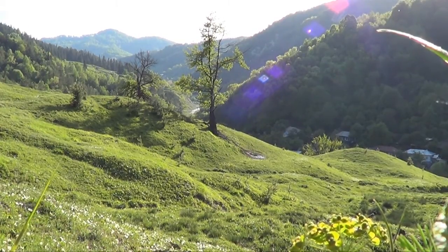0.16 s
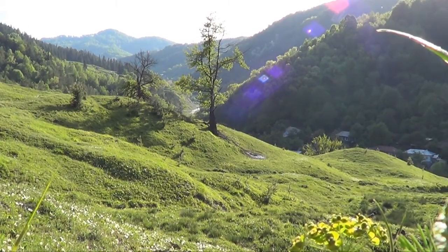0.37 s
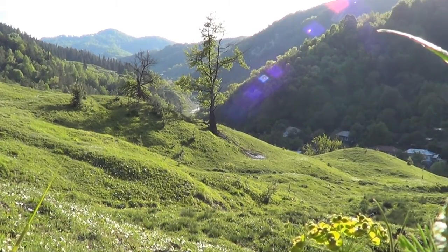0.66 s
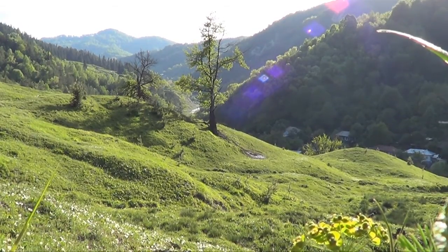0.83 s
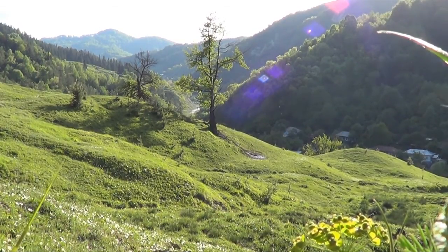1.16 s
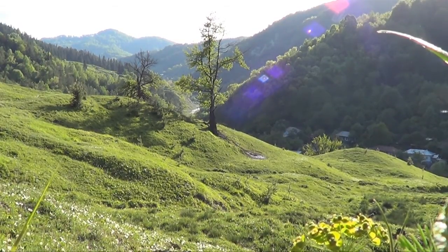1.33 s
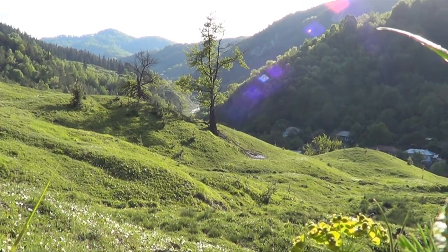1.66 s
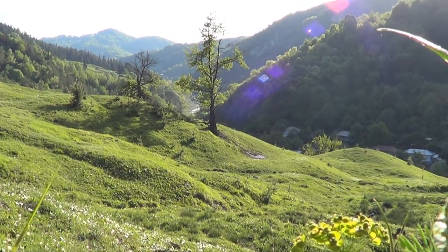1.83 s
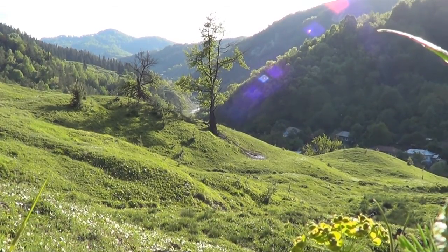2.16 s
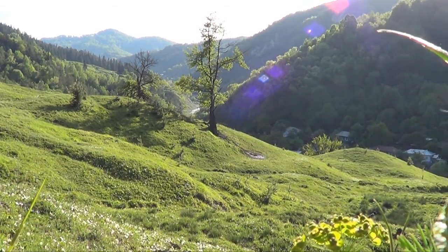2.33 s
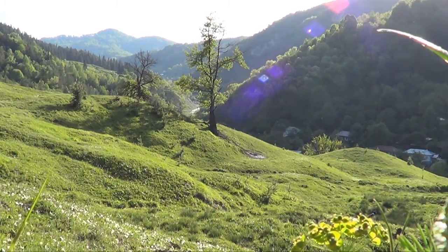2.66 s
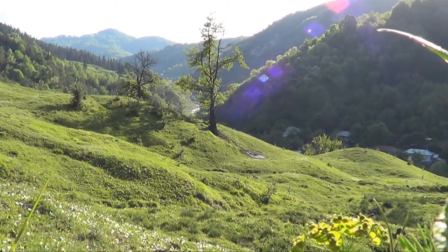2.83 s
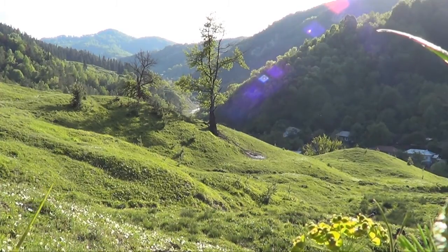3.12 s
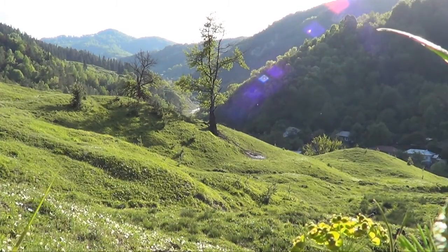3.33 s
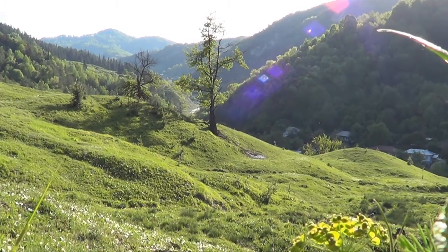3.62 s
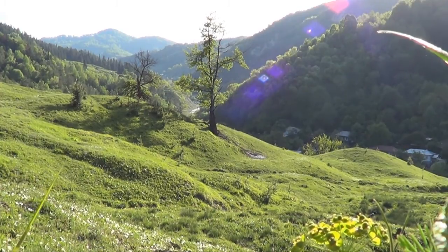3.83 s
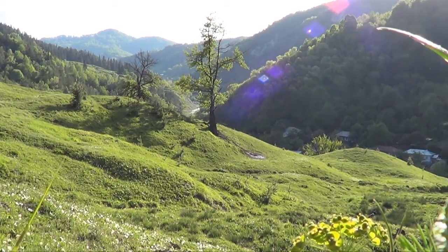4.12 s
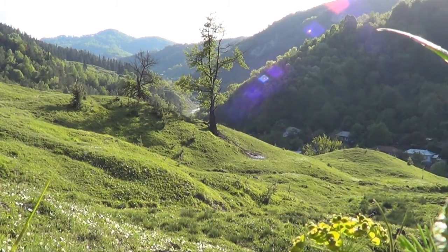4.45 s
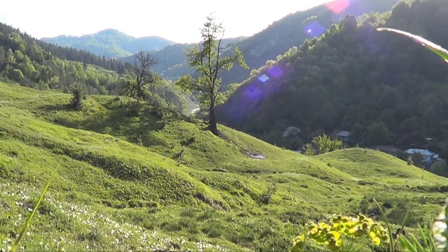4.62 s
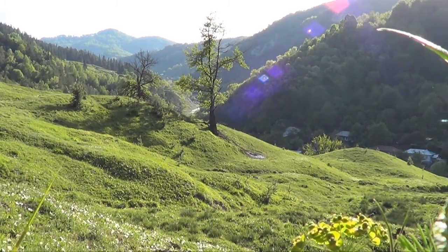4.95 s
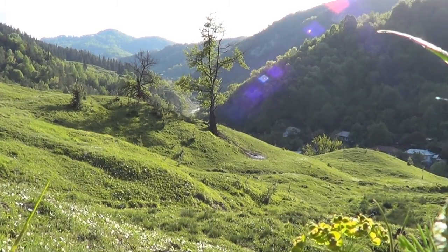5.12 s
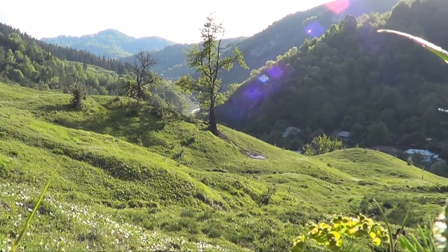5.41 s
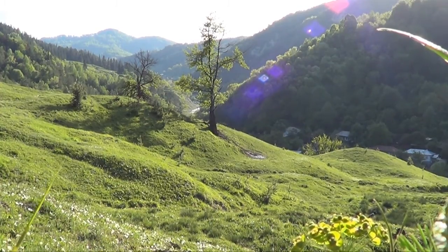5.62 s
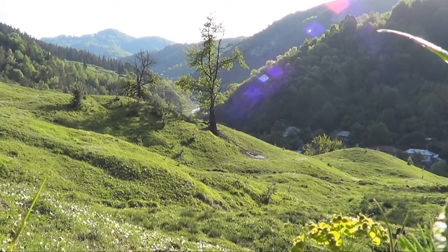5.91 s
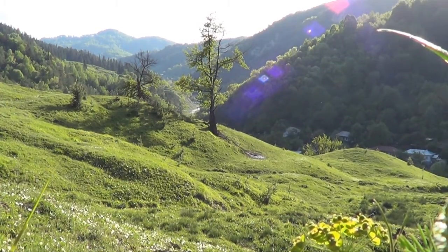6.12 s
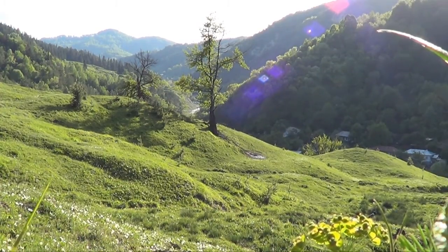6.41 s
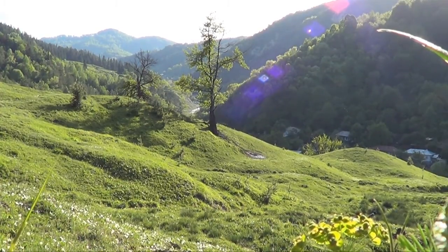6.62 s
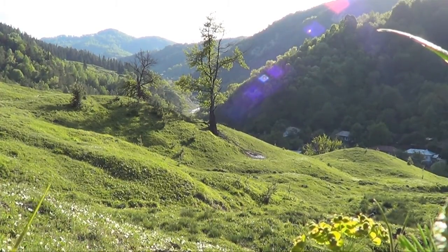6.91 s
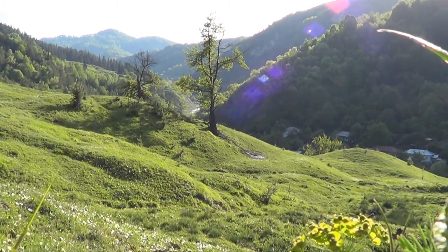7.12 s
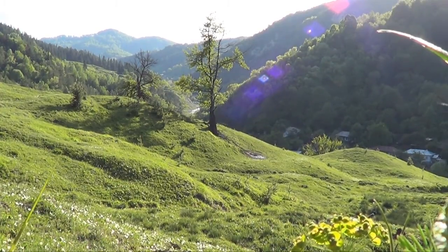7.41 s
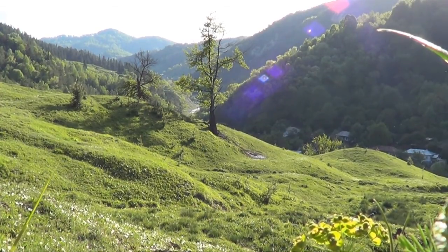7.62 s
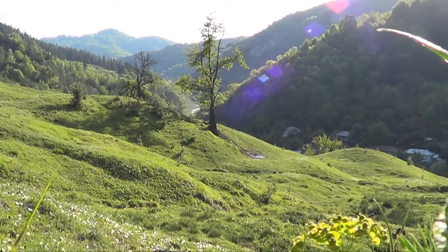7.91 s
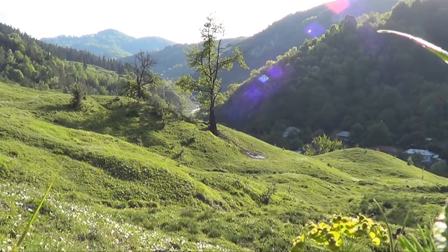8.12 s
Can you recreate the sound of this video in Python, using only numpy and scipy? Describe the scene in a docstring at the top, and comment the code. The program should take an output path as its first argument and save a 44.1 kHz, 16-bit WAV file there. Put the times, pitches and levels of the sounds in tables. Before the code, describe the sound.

Quiet outdoor stereo ambience on a grassy slope, with light wind rumbling on the microphone and tiny dry ticks from stalks. A distant woodpecker rolls, a nearer and lower-toned one answers much louder with woody echoes, and a breeze stirs the grass. Later, faint rising chirps lead into the distant drum again, overlapped by a finch's chattering song, then clear high whistles slightly to the right.

```python
"""Drumming in a mountain meadow

Two woodpeckers drum on branches: volleys of short wooden rings, each speeding up, with echoes from the trees.
Towards the end a finch sings in gliding near-pure tones, and a second small bird whistles above it.
Dry stalks tick as filtered noise bursts; a breeze rumbles on the microphone and rustles the grass.
Underneath lies the valley's soft hush of coloured noise."""
import sys
import numpy as np
from scipy import signal
from scipy.fft import rfft, irfft
from scipy.io import wavfile
from scipy.ndimage import uniform_filter1d

SR = 44100
rng = np.random.default_rng(int(sys.argv[2]) if len(sys.argv) > 2 else 0)


def dump_mix(stems):
    """Bounce the given channels to the path in sys.argv[1] as a 16-bit WAV at rate SR."""
    frames = np.atleast_2d(stems).T  # one column per channel
    limited = np.clip(frames, -1, 1)  # hard clip at full scale
    pcm = np.round(limited * 32767).astype(np.int16)
    wavfile.write(sys.argv[1], SR, pcm)


N = 364707
TIME = np.arange(N) / SR


def undb(db):
    """Decibels to gain."""
    return 10 ** (np.asarray(db) / 20)


def unit(x):
    """Scale to an rms of one."""
    return x / np.sqrt(np.mean(x ** 2))


def add(track, start_s, sound):
    """Mix a sound into a track at a time, cut at the track's end."""
    i = max(int(round(start_s * SR)), 0)
    track[i:i + len(sound)] += sound[:max(N - i, 0)]


def colour(x, points):
    """Filter a signal through a curve of (f/Hz, level/dB) points, straight over log frequency; rms one."""
    hz, db = np.transpose(points)
    bins = np.fft.rfftfreq(len(x), 1 / SR) + 0.1  # keeps the logarithm finite at 0 Hz
    gain = undb(np.interp(np.log(bins), np.log(hz), db))
    return unit(irfft(rfft(x) * gain, len(x)))


def walk(rate):
    """A random control curve: levels held for 1 / rate s, slewed twice; rms one."""
    hold = int(SR / rate)
    steps = np.repeat(rng.standard_normal(N // hold + 1), hold)
    return unit(uniform_filter1d(uniform_filter1d(steps, hold), hold)[:N])


def stereo(mid, side):
    """Left and right from what they share and what differs."""
    return np.array([mid + side, mid - side])


def forest(x, scatter, wet_db, t60, side_db, onset_s, direct_side_db):
    """Echoes from many trunks, large and small: a tail that builds up and dies away, different in each ear."""
    t = np.arange(SR) / SR
    envelope = (1 - np.exp(-t / onset_s)) * undb(-60 * t / t60)
    envelope = undb(wet_db) * envelope / np.sqrt(np.sum(envelope ** 2))
    trunks = rng.standard_normal((2, SR)) * (rng.random((2, SR)) < 1500 / SR)  # about 1500 echoes a second
    mid, side = (signal.fftconvolve(x, envelope * colour(echoes, scatter))[:N] for echoes in trunks)
    # sound from the right reaches the left port a fraction of a sample late
    lag = -undb(direct_side_db) * np.gradient(x)
    return stereo(x + mid, undb(side_db) * side + lag)


def roll(start, blows, first_gap, last_gap, full_db, first_db, build_s, last_db, lateness, hurry):
    """Rows (t/s, level/dB): the beak rebounds ever faster while its force builds up and then runs out."""
    along = np.linspace(0, 1, int(round(blows)))
    gaps = first_gap + (last_gap - first_gap) * np.linspace(0, 1, len(along) - 1) ** hurry
    t = np.append(0, np.cumsum(gaps))
    build_db = first_db * np.exp(-t / build_s)
    fade_db = last_db * along ** lateness
    return np.column_stack([start + t, full_db + build_db + fade_db])


def drumming(blows, wood, echoes, low_hz, top_hz, soft_db, echo_hz):
    """Each blow rings the branch briefly; weak blows are duller; ground and trunks throw it back."""
    t = np.arange(SR // 20) / SR
    hz, db, t60, swing = np.transpose(wood)[:, :, None]
    hardest_db = max(blow_db for _, blow_db in blows)
    low_cut = signal.butter(2, low_hz, "high", fs=SR, output="sos")
    top_cut = signal.butter(6, top_hz, fs=SR, output="sos")
    track = np.zeros(N)
    for start, blow_db in blows:
        dull_db = soft_db * (blow_db - hardest_db) * np.log2(hz / hz[0])
        detune = 1 + 0.0025 * rng.standard_normal(hz.shape)  # the beak never lands on quite the same spot
        decay = undb(db + dull_db - 60 * t / t60)
        ring = np.sum(np.sign(swing) * decay * np.sin(2 * np.pi * hz * detune * t), axis=0)
        knock = signal.sosfilt(np.vstack([low_cut, top_cut]), ring)
        slip_s = 0.0004 * rng.standard_normal()  # each blow shifts at random by a fraction of a millisecond
        add(track, start + slip_s, undb(blow_db) * knock / np.abs(knock).max())
    # turf and bark swallow the top of the echoes
    dulled = signal.sosfiltfilt(signal.butter(2, echo_hz, fs=SR, output="sos"), track)
    returns = (undb(echo_db) * np.interp(TIME - delay, TIME, dulled, left=0) for delay, echo_db in echoes)
    return track + sum(returns)


# ringing modes of each branch: [f/Hz, level/dB, t60/s, +1 or -1: swings with or against the blow]
FAR_WOOD = [(837, -8, 0.011, 1), (1073, -6.5, 0.024, -1), (1660, 3.5, 0.0036, -1), (1835, -12, 0.039, 1),
            (2168, -11.5, 0.019, 1), (2530, -18.5, 0.026, -1), (2820, -20, 0.018, -1)]
NEAR_WOOD = [(450, -27.5, 0.0063, 1), (884, -19.5, 0.013, 1), (1238, -6.5, 0.011, 1),
             (1547, 0.0, 0.011, -1), (1704, -7, 0.011, 1), (2224, -17.5, 0.013, -1)]
# single echoes from ground and trunks: [delay t/s, level/dB]
FAR_ECHOES = [(.00175, -5.5), (.0078, -14.5), (0.0237, -13), (0.0463, -24)]
NEAR_ECHOES = [(.0058, -13.5), (0.011, -25), (0.04, -18)]
# colour of what the trees send back: [f/Hz, level/dB]
FAR_SCATTER = [(1000, -0.0059), (1350, 1), (1750, -2.6), (2600, -1.4)]
NEAR_SCATTER = [(500, 5), (850, -2), (1550, -11.5), (2000, 7.5), (2220, 0), (2900, 4.5)]
# drum rolls: [start t/s, blows, first gap t/s, last gap t/s, full force level/dB, first blow re full level/dB,
#              build-up t/s, last blow re full level/dB, lateness of the fade as a power]
FAR_ROLLS = [(1.5654, 14, .0604, .03633, -21, -17, 0.1, -19.5, 3.9),
             (6.9422, 15, .05764, .03458, -20.5, -13.5, 0.14, -18.5, 2.45)]
NEAR_ROLLS = [(2.9427, 11, .0589, .04275, -9.5, -10.5, 0.037, -10, 4.1)]
# how late in a roll each bird speeds up (power; 1 = evenly)
FAR_HURRY, NEAR_HURRY = 1, 1.79


def woodpeckers():
    """The far bird opens, the near one answers, the far one drums again; each branch has its own ring."""
    far_blows = np.vstack([roll(*row, FAR_HURRY) for row in FAR_ROLLS])
    near_blows = np.vstack([roll(*row, NEAR_HURRY) for row in NEAR_ROLLS])
    far = drumming(far_blows, FAR_WOOD, FAR_ECHOES, low_hz=820, top_hz=3010, soft_db=0.7, echo_hz=2240)
    near = drumming(near_blows, NEAR_WOOD, NEAR_ECHOES, low_hz=253, top_hz=3160, soft_db=0.16, echo_hz=3000)
    return (forest(far, FAR_SCATTER, wet_db=-6.0, t60=0.46, side_db=-13, onset_s=0.0034, direct_side_db=-5)
            + forest(near, NEAR_SCATTER, wet_db=3.5, t60=0.42, side_db=-12.5, onset_s=0.012, direct_side_db=-9.5))


def note(shape, waver, flutter_db):
    """A nearly pure tone sliding along (t/s, f/Hz, level/dB) points, unsteady in pitch and level."""
    s, hz, db = np.transpose(shape)
    t = np.arange(s[0], s[-1], 1 / SR)
    pitch = uniform_filter1d(np.interp(t, s, hz), SR // 250)
    knots = np.arange(s[0], s[-1], 1 / 300)
    wobble, flutter = (np.interp(t, knots, rng.standard_normal(len(knots))) for _ in range(2))
    size = undb(np.interp(t, s, db) + flutter_db * flutter) * signal.windows.tukey(len(t), 0.1)
    return size * np.sin(2 * np.pi * np.cumsum(pitch * (1 + waver * wobble)) / SR)


def syllable(shape, length, hoarse):
    """One utterance of a shape; no two are at quite the same pitch."""
    detune = 1 + 0.00804 * rng.standard_normal()
    return note(np.array(shape) * [length, detune, 1], waver=hoarse, flutter_db=2.5)


WHISTLE_SETTLE_S = 0.008
WHISTLE_OPEN_DB, WHISTLE_CLOSE_DB = -12.5, -15  # relative to the loudest moment


def whistle(length, open_hz, settled_hz, close_hz, db, loudest_s):
    """The pitch snaps onto a slow glide while the tone swells and fades."""
    t = np.linspace(0, length, SR // 1000)
    glide = np.interp(t, [0, length], [settled_hz, close_hz])
    hz = glide + (open_hz - settled_hz) * np.exp(-t / WHISTLE_SETTLE_S)
    swell_db = np.interp(t, [0, loudest_s, length], [WHISTLE_OPEN_DB, 0, WHISTLE_CLOSE_DB])
    return note(np.column_stack([t, hz, db + swell_db]), waver=0.0037, flutter_db=4.0)


# syllable shapes: [t/s, f/Hz, level/dB]
UPSLUR = [(0, 2605, -5), (.03, 3280, -5), (.055, 4300, 0), (.075, 5360, -7)]
PIP = [(0, 2700, 2.5), (.012, 3190, -7), (.028, 3800, 1.5)]
TSIP = [(0, 6500, 0), (.015, 5790, -3.5), (.03, 5000, 0), (.045, 5100, -5)]
CHIP = [(0, 5135, -3), (.01, 4670, -4.5), (.022, 3950, -1.5), (.03, 4150, -4.5)]
WARBLE = [(0, 4480, -13), (.013, 4810, -5), (.023, 4620, -24), (.032, 4270, -1.5), (.042, 3700, -0.5),
          (.053, 3110, -2), (.065, 3670, -2.5), (.072, 3200, -22), (.088, 3577, -1.5), (.098, 2927, -5),
          (.109, 2080, -6.5)]
# lone rising chirps before the song: [start t/s, level/dB, length relative to the shape]
UPSLURS = [(5.829, -61.5, 0.97), (6.036, -62, 0.49), (6.086, -56, 0.47), (6.175, -53.5, 0.89)]
# the finch's song, one run per syllable: [shape, first start t/s, last start t/s, repeats,
#                                          first level/dB, last level/dB, hoarseness as a share of pitch]
FINCH_RUNS = [(PIP, 6.362, 6.812, 5, -59.5, -55, 0.043), (TSIP, 6.43, 6.752, 6, -59.5, -55, .06),
              (CHIP, 6.81, 7.258, 8, -51, -44, 0.032), (WARBLE, 7.326, 8.147, 6, -41, -41, 0.0161)]
# share by which the gaps of a run start short and end long
FINCH_SLOWING = 0.035
# thin whistles: [start t/s, length t/s, opening f/Hz, settled f/Hz, closing f/Hz, level/dB, loudest after t/s]
WHISTLES = [(7.59, 0.13, 7100, 5150, 5500, -39, 0.042), (7.89, 0.13, 7150, 5900, 5710, -37.5, .058),
            (8.049, .107, 6900, 4900, 5500, -38, 0.098), (8.192, 0.074, 5700, 6300, 4750, -34.5, 0.027)]
# colour of what the trees send back of the song: [f/Hz, level/dB]
SONG_SCATTER = [(3000, -0.18), (4000, -0.45), (6000, -0.13)]


def songbirds():
    """Faint rising chirps, then the finch's slightly slowing runs of gliding tones, and the whistler on top."""
    finch, whistler = np.zeros(N), np.zeros(N)
    for start, db, length in UPSLURS:
        add(finch, start, undb(db) * syllable(UPSLUR, length, hoarse=0.014))
    for shape, first_s, last_s, repeats, first_db, last_db, hoarse in FINCH_RUNS:
        for along in np.linspace(0, 1, int(round(repeats))):
            start = first_s + (last_s - first_s) * along * (1 - FINCH_SLOWING * (1 - along))
            db = first_db + (last_db - first_db) * along
            add(finch, start, undb(db) * syllable(shape, 0.98, hoarse))
    for start, *row in WHISTLES:
        add(whistler, start, whistle(*row))
    finch = forest(finch, SONG_SCATTER, wet_db=-0.5, t60=0.92, side_db=-0.5, onset_s=0.00063, direct_side_db=-3)
    whistler = forest(whistler, SONG_SCATTER, wet_db=-8, t60=0.86, side_db=-2, onset_s=0.011, direct_side_db=-8)
    return finch + whistler * undb([[-0.8], [0.8]])  # the whistler leans right


CALM_RUSTLE_DB = -60.5
# gusts rise quickly in the grass and die away more slowly: [start t/s, lift level/dB, rise t/s, fade t/s]
GUSTS = [(2.05, 14, 0.16, 3.06), (3.72, 4.5, 0.089, 0.63)]


def rustle_db():
    """Level of the grass: calm, then lifted by each gust."""
    start, lift_db, rise_s, fade_s = np.transpose(GUSTS)[:, :, None]
    age = np.maximum(TIME - start, 0)
    gusts_db = lift_db * (1 - np.exp(-age / rise_s)) * np.exp(-age / fade_s)
    return CALM_RUSTLE_DB + np.sum(gusts_db, axis=0)


def faint_ticks(count):
    """Tick rows at random moments, their level following the rustle."""
    when, pitch = rng.random((count, 2)).T
    start = when * TIME[-1]
    db = np.interp(start, TIME, rustle_db()) + 14
    snap_db = np.full(count, -12)
    return list(zip(start, db, snap_db, np.interp(pitch, [0, 1], [5800, 11400])))


# the clearest ticks near the microphone: [start t/s, level/dB, middle register re that level/dB, centre f/Hz]
TICKS = [(0.0926, -37, -14, 10000), (0.181, -41, -13, 9450), (0.4319, -36, -20, 10400),
         (2.1063, -38.5, -7, 7650), (2.631, -36, -4, 5230), (2.7726, -35, -22, 11500),
         (3.6952, -38, -12, 5780), (3.894, -36, -4, 7940), (4.6503, -37.5, -15, 6070),
         (5.4186, -43, 2, 7680), (5.4494, -48, 2, 11300), (5.7618, -41.5, -11, 7800),
         (5.823, -37.5, -9.5, 10900)]


def stalks():
    """Brief dry ticks: decaying bursts of bright noise over a lower snap of varying strength."""
    t = np.arange(SR // 25) / SR
    track = np.zeros(N)
    for start, db, snap_db, hz in list(TICKS) + faint_ticks(count=6):
        bright_curve = [(hz / 3, -20), (hz / 1.41, -5), (hz, 0), (hz * 1.3, -6)]
        snap_curve = [(300, -2), (1000, 4.5), (2000, 8), (5000, -24.0), (10000, -37)]
        bright = colour(rng.standard_normal(len(t)), bright_curve)
        snap = colour(rng.standard_normal(len(t)), snap_curve)
        add(track, start, undb(db - 60 * t / 0.024) * (bright + undb(snap_db) * snap))
    return track


# wind eddies on the microphone: [t/s, rumble level/dB]
EDDIES = [(0, -36.5), (.75, -37.5), (1.1, -43), (2.1, -41), (2.65, -29), (3.4, -34.5), (4.5, -37.5),
          (5.8, -39), (6.3, -37), (7.2, -39.5), (7.75, -34.5), (8.27, -42)]
# colours of rumble and grass: [f/Hz, level/dB]
RUMBLE_COLOUR = [(4, -3), (9, 2), (16, -5.5), (30, -18), (60, -25.5), (120, -40.5), (300, -70.5)]
RUSTLE_COLOUR = [(300, -5), (1000, 2.5), (2200, 6), (3000, -0.5), (4200, 2.5), (6000, 7.5), (8000, 5.5),
                 (10000, 6.5), (11500, 9.5), (12500, -11)]


def breeze():
    """Eddies rumble on the microphone; grass blades brush as flickering noise and countless tiny clicks."""
    rumble = undb(np.interp(TIME, *np.transpose(EDDIES))) * colour(rng.standard_normal(N), RUMBLE_COLOUR)
    click_gain = undb(3.64 * np.minimum(rng.exponential(size=N), 6))  # a few stand out
    clicks = (rng.random(N) < 1500 / SR) * rng.standard_normal(N) * click_gain
    brushing = rng.standard_normal(N) * undb(1.95 * walk(120) + 0.89 * walk(22))
    grass = colour(brushing + 0.5 * unit(clicks), RUSTLE_COLOUR)
    return rumble + undb(rustle_db()) * grass


# the hush over time: [t/s, level/dB, extra difference between the ears level/dB]
HUSH = [(0, -56.5, -0.5), (2.2, -53, -6.5), (5.5, -54.5, -7), (6.5, -52.5, 9), (8.27, -51, 7)]
# its colour: [f/Hz, level/dB]
HUSH_COLOUR = [(40, 0.5), (100, 2.5), (300, 1.5), (600, -2.5), (1100, -7), (2200, -16.5), (3000, -27.5),
               (5000, -29.5), (8000, -37), (12000, -40)]
# how much it differs between the ears: [f/Hz, side re mid level/dB]
HUSH_WIDTH = [(60, -43), (150, -23.5), (400, -19), (1000, -13), (2500, -43), (5000, -24), (8000, -20)]


def valley():
    """Distant water and trees: a soft, slowly wavering noise hush, nearly the same in both ears."""
    mid, side = (colour(rng.standard_normal(N), HUSH_COLOUR) for _ in range(2))
    hz, width_db = np.transpose(HUSH_WIDTH)
    width = undb(np.interp(np.fft.rfftfreq(N, 1 / SR), hz, width_db))
    side = irfft(rfft(side) * width, N)
    s, level_db, wider_db = np.transpose(HUSH)
    level = undb(np.interp(TIME, s, level_db) + 0.2 * walk(5))
    return level * stereo(mid, undb(np.interp(TIME, s, wider_db)) * side)


def scene():
    """Everything heard from the meadow."""
    return woodpeckers() + songbirds() + stalks() + breeze() + valley()


def record(dry):
    """The recorder cuts the top steeply: an elliptic low-pass."""
    return signal.sosfilt(signal.ellip(10, 0.2, 70, 12050, fs=SR, output="sos"), dry)


dry = scene()
out = record(dry)
dump_mix(out)
```